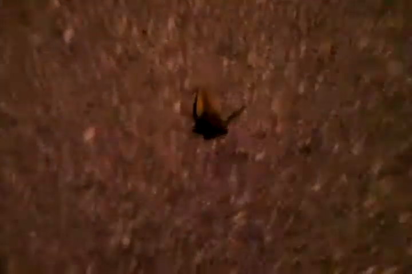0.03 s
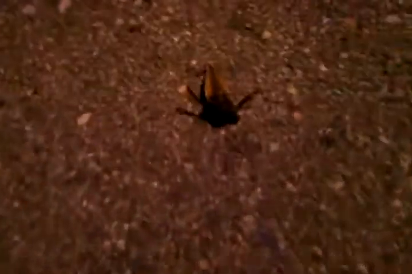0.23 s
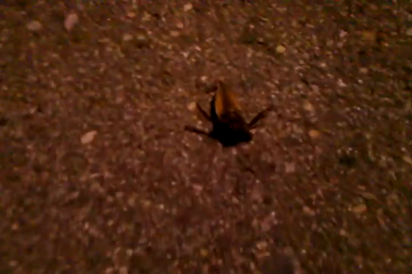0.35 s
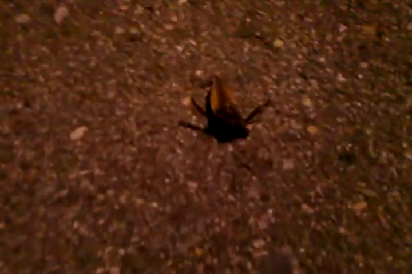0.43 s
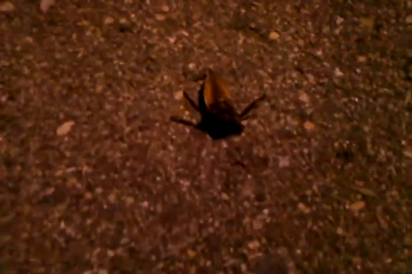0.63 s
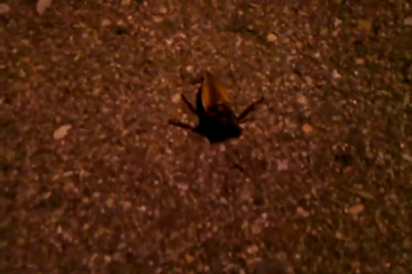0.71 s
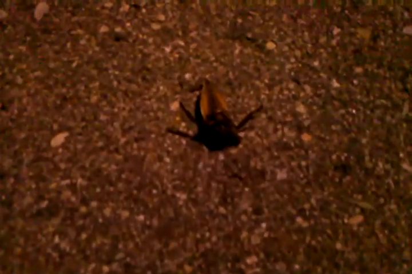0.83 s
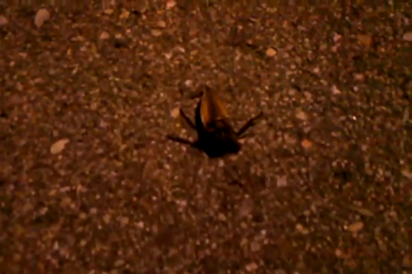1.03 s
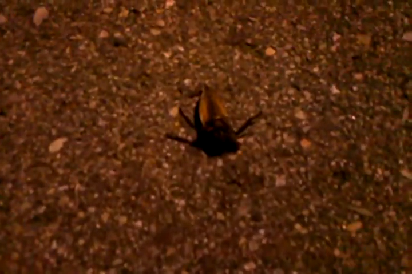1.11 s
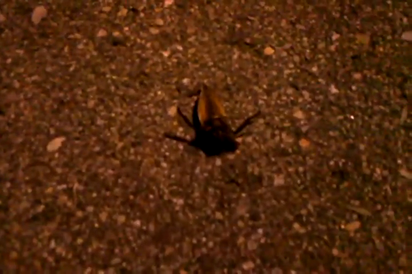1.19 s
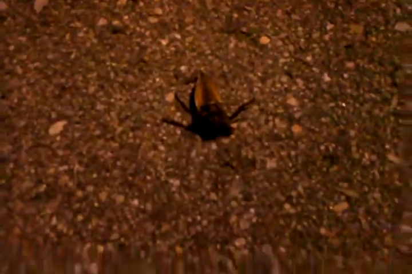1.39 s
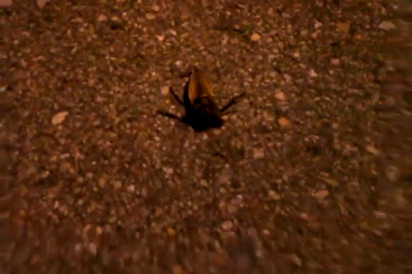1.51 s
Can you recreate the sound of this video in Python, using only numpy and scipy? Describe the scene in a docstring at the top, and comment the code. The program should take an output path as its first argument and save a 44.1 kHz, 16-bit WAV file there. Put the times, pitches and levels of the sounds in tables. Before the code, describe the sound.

A large insect scrabbles on gritty pavement, with one hollow knock and short dry scratches.

```python
"""A large insect scrabbles on pavement at night, close to the microphone.
One hollow knock with a few dull rebounds, then its claws and shell scratch over the grit in short dry rasps
that thicken, thin out and stop. A faint low outdoor rumble with a hum lies underneath."""
import sys
import numpy as np
from scipy import signal
from scipy.fft import rfft, irfft, next_fast_len
from scipy.io import wavfile

SR = 44100
rng = np.random.default_rng(int(sys.argv[2]) if len(sys.argv) > 2 else 0)


def generate_wav(sig):
    """Save sig (samples, or channels by samples) to the path in sys.argv[1] as 16-bit PCM at SR."""
    pcm = np.round(np.clip(np.atleast_2d(sig).T, -1, 1) * 32767).astype(np.int16)
    wavfile.write(sys.argv[1], SR, pcm)


N = 68355

# a claw or the shell catches on the grit: (s, length s, treble level dB, midrange level dB, ring Hz)
SCRATCHES = [(0.0161, 0.002, -58, -65, 5900), (0.0238, 0.002, -60, -52, 2800), (0.0374, 0.0018, -58, -79, 5000),
             (0.0814, 0.0017, -56, -72, 6700), (0.0857, 0.0018, -51, -62, 5400), (0.0982, 0.0057, -63, -72, 5500),
             (0.1091, 0.0012, -58, -64, 4900), (0.1588, 0.0059, -62, -71, 5000), (0.1898, 0.0028, -54, -64, 4300),
             (0.2006, 0.0053, -39, -46, 4700), (0.2102, 0.0031, -43, -50, 4600), (0.2178, 0.002, -48, -55, 4700),
             (0.2228, 0.0011, -41, -48, 5500), (0.2746, 0.0019, -52, -58, 6100), (0.3396, 0.0012, -49, -63, 6400),
             (0.3475, 0.0075, -54, -70, 4100), (0.365, 0.0011, -43, -71, 6200), (0.4014, 0.0012, -46, -64, 6100),
             (0.4171, 0.0038, -41, -51, 6100), (0.4223, 0.0015, -45, -58, 6300), (0.4317, 0.0015, -40, -62, 6400),
             (0.4519, 0.0042, -48, -63, 6200), (0.4592, 0.0033, -45, -66, 6500), (0.4673, 0.0025, -44, -53, 5100),
             (0.4757, 0.0022, -37, -54, 5200), (0.4833, 0.0016, -38, -50, 6500), (0.5075, 0.0034, -48, -66, 6400),
             (0.5329, 0.0019, -46, -71, 6400), (0.5379, 0.001, -47, -70, 5200), (0.5447, 0.0024, -35, -44, 6400),
             (0.5573, 0.002, -38, -55, 6600), (0.5648, 0.002, -42, -64, 6000), (0.5968, 0.0055, -52, -63, 6500),
             (0.6336, 0.0049, -57, -74, 4600), (0.6503, 0.0037, -55, -56, 3000), (0.6614, 0.0017, -50, -68, 5000),
             (0.7531, 0.0017, -43, -74, 6000), (0.7573, 0.0056, -53, -57, 3100), (0.7669, 0.004, -52, -66, 6200),
             (0.7988, 0.0019, -50, -61, 6400), (0.8047, 0.0023, -50, -62, 6200), (0.827, 0.0051, -57, -70, 4800),
             (0.84, 0.0012, -47, -51, 5100), (0.848, 0.0044, -52, -63, 5300), (0.9037, 0.0024, -57, -69, 6800),
             (0.9194, 0.0018, -50, -62, 6200), (0.9321, 0.0015, -50, -53, 5000), (0.9524, 0.0029, -56, -64, 6500),
             (0.9665, 0.0035, -55, -59, 2800), (0.9773, 0.0033, -50, -61, 4700), (0.9908, 0.0019, -52, -65, 6400),
             (1.0046, 0.0045, -58, -66, 4800), (1.1181, 0.0045, -59, -66, 5100), (1.163, 0.0024, -49, -64, 4600),
             (1.1673, 0.002, -58, -79, 6100), (1.1982, 0.0032, -62, -74, 6800), (1.2112, 0.002, -58, -71, 5100),
             (1.3034, 0.0016, -52, -63, 5700), (1.3444, 0.0053, -63, -69, 3400), (1.3907, 0.0014, -57, -67, 5500)]   # fixed
SLIPS_PER_S, SLIP_SPREAD_DB = 8600, 3   # tiny slips within one scratch
SCRATCH_ATTACK_S, SCRATCH_RELEASE_S = .0003, .0006   # fixed
TREBLE_DB, MIDRANGE_DB = 1.5, 2
# the two colours of a scratch: (Hz, dB)
TREBLE = [(1500, -29.5), (2600, -17.5), (3300, -8.5), (4200, -8), (5300, -4.5), (6000, -2), (6650, 1.5), (7300, 2), (8800, -6), (10000, -43)]
MIDRANGE = [(150, -2), (400, 0.5), (1100, 2.5), (1800, 0.5), (2400, 2.5), (3100, 3.5), (4000, -21), (7000, -32.5)]
SCATTER_DB, SCATTER_S = -14, 0.0023   # sound thrown back by the ground nearby
# steady scraping between the scratches: (s, dB)
SCRAPING = [(0, -63), (.1, -70), (.13, -69), (.185, -70.5), (.21, -54.5), (.26, -55.5), (.3, -60.5), (.325, -62), (.365, -51.5), (.44, -53.5), (.5, -53), (.55, -53), (.58, -59.5), (.62, -59), (.68, -57.5), (.745, -55), (.79, -56), (.845, -54), (.87, -59.5), (.93, -58), (.985, -60.5), (1.03, -68.5), (1.075, -60.5), (1.105, -73), (1.14, -61.5), (1.19, -72), (1.28, -70.5), (1.38, -70.5), (1.43, -73.5), (1.55, -78)]
# colour of the scraping: (Hz, dB)
GRIT = [(200, -8.5), (500, -6), (1200, -5), (1900, -9), (3000, -5.5), (3800, -4.5), (5200, -1), (6000, -1.5), (6700, 0.5), (7300, -0.5), (9000, -12.5)]
# the knock and its rebounds: (s, level dB, brightness as cut-off Hz)
KNOCKS = [(.2007, -23, 2450), (0.2181, -32.5, 1320), (0.2221, -44, 1500), (0.2316, -50, 725), (0.2408, -31.5, 560), (0.2623, -48, 550), (0.2741, -41, 700)]
# modes of the hollow body that is struck: (Hz, dB, t60 s)
BODY = [(235, -26, 0.0093), (394, -11, 0.0073), (527, -1, .012), (695.4, -1.5, 0.031), (994, -9, 0.018), (1158, -18.5, .04), (1350, -13, 0.022), (1539, -19, .045), (2398, -9.5, 0.042), (4190, -7.5, 0.029), (5020, -5, 0.053), (5800, -1, 0.063)]
KNOCK_ECHO_DB, KNOCK_ECHO_S = -12, 0.018
# distant outdoor rumble: (Hz, dB)
RUMBLE = [(25, -31), (45, -34), (70, -7.5), (130, 3), (200, -0.5), (280, -1), (420, -6.5), (700, -11), (1100, -16.5), (2000, -21.5), (4000, -22), (7000, -33)]
RUMBLE_DB = -61.5
HUM_HZ, HUM_DB, HUM_WAVER_DB = 118.3, -73, 0.5
CUTOFF_HZ = 8850   # fixed
T = np.arange(N) / SR
ROLLOFF_HZ = 6950   # fixed
LEAK_DB = -32   # what passes above the roll-off
KNOCK_LOW_HZ = 183.6
CLAW_RING_DB, CLAW_RING_S = -13.5, 0.0021   # each catch rings briefly at a pitch of its own
GRAINS_PER_S, GRAIN_SPREAD_DB = 4000, 3
SCRAPE_FLUTTER_DB, FLUTTER_HZ = 1.5, 130   # fixed


def from_db(db):
    """Decibels to gain."""
    return 10 ** (np.asarray(db) / 20)


def rms_one(x):
    """Scale to an rms of one."""
    return x / np.sqrt(np.mean(x ** 2) + 1e-20)


def colour(x, spectrum):
    """Causal filter through (Hz, dB) points; white noise keeps its power below the roll-off."""
    size = next_fast_len(N + 8192)
    hz = np.maximum(np.arange(size // 2 + 1) * SR / size, 1)
    points = np.array(spectrum)
    gain = from_db(np.interp(np.log(hz), np.log(points[:, 0]), points[:, 1]))
    gain = gain / np.sqrt(np.mean(gain ** 2 * (hz < ROLLOFF_HZ)))
    cepstrum = irfft(np.log(gain), size)
    cepstrum[1:size // 2] *= 2
    cepstrum[size // 2 + 1:] = 0
    return irfft(rfft(x, size) * np.exp(rfft(cepstrum)), size)[:N]


def drift(hz):
    """Slow random wandering with a spread of one."""
    r = np.exp(-2 * np.pi * hz / SR)
    return rms_one(signal.lfilter([1], [1, -2 * r, r * r], rng.standard_normal(2 * N))[N:])


def clicks(per_s, spread_db):
    """Random clicks of uneven size and sign."""
    sizes = from_db(spread_db * np.minimum(rng.exponential(1, N), 4))  # fixed
    return sizes * rng.choice([-1, 1], N) * (rng.random(N) < per_s / SR)


def ring(x, hz, t60):
    """A unit click sets a sine of height one ringing."""
    r, w = from_db(-60 / (t60 * SR)), 2 * np.pi * hz / SR  # fixed
    return signal.lfilter([0, r * np.sin(w)], [1, -2 * r * np.cos(w), r * r], x + 1e-18)


def scatter(x, level_db, decay_s):
    """Add a short diffuse tail of reflections."""
    t = T[:SR // 5]
    tail = rng.standard_normal(len(t)) * np.exp(-t / decay_s) * (1 - np.exp(-2 * t / decay_s))
    return x + from_db(level_db) * signal.fftconvolve(x, tail / np.linalg.norm(tail))[:N]


def rasps(spectrum, levels_db, ring_db):
    """Each scratch is a quick run of slips that rings at its own pitch."""
    slips, out = clicks(SLIPS_PER_S, SLIP_SPREAD_DB), np.zeros(N)
    t = T[:SR // 40]
    one_slip = colour(signal.unit_impulse(N), spectrum)[:len(t)]
    for (s, length, _, _, hz), db in zip(SCRATCHES, levels_db):
        start = int(max(s, 0) * SR)
        shape = np.minimum(t / SCRATCH_ATTACK_S, 1) * np.exp(-np.maximum(t - length, 0) / SCRATCH_RELEASE_S)
        run = np.convolve(slips[start:start + len(t)] * shape, one_slip)[:len(t)]
        run = run + from_db(ring_db) * ring(run, hz, CLAW_RING_S)
        out[start:start + len(t)] += from_db(db) * run * np.linalg.norm(shape) / (np.linalg.norm(run) + 1e-9)
    return out


def scratches():
    """Claws catch and let go: a bright ringing rasp with a weaker, duller part."""
    _, _, treble_db, midrange_db, _ = np.transpose(SCRATCHES)
    return rasps(TREBLE, treble_db + TREBLE_DB, CLAW_RING_DB) + rasps(MIDRANGE, midrange_db + MIDRANGE_DB, ring_db=-34)


def scraping():
    """Legs and shell drag over fine grit, in uneven clumps of grains."""
    grains = rms_one(clicks(GRAINS_PER_S, GRAIN_SPREAD_DB) * from_db(SCRAPE_FLUTTER_DB * drift(FLUTTER_HZ)))
    return colour(grains * from_db(np.interp(T, *np.transpose(SCRAPING))), GRIT)


def knock():
    """One firm contact and softer rebounds ring the same small hollow body, which radiates little bass."""
    force = np.zeros(N)
    for s, db, hz in KNOCKS:
        soft = signal.butter(2, min(hz, SR / 3), fs=SR)
        force += signal.lfilter(*soft, from_db(db) * signal.unit_impulse(N, int(s * SR)) + 1e-18)
    body = sum(from_db(db) * ring(force, hz, t60) for hz, db, t60 in BODY)
    radiated = signal.lfilter(*signal.butter(2, KNOCK_LOW_HZ, "high", fs=SR), body)
    return scatter(radiated, KNOCK_ECHO_DB, KNOCK_ECHO_S)


def night_air():
    """Far rumble and a wavering low hum."""
    hum = np.sqrt(2) * np.sin(2 * np.pi * HUM_HZ * T + 0.8 * drift(4)) * from_db(HUM_DB + HUM_WAVER_DB * drift(17))
    return from_db(RUMBLE_DB) * colour(rng.standard_normal(N), RUMBLE) + hum


def scene():
    """The insect, the knock and the night air."""
    insect = scatter(scratches() + scraping(), SCATTER_DB, SCATTER_S)
    return (insect + knock() + night_air())[None]


def record(dry):
    """A small recorder with little bass and a steep roll-off, past which a trace of treble leaks."""
    thin = signal.sosfilt(signal.butter(3, 70, "high", fs=SR, output="sos"), dry)
    narrow = signal.sosfilt(signal.butter(28, ROLLOFF_HZ, fs=SR, output="sos"), thin)  # fixed
    return signal.sosfilt(signal.ellip(10, .3, 80, CUTOFF_HZ, fs=SR, output="sos"), narrow + from_db(LEAK_DB) * thin)  # fixed


dry = scene()
out = record(dry)
generate_wav(out)
```